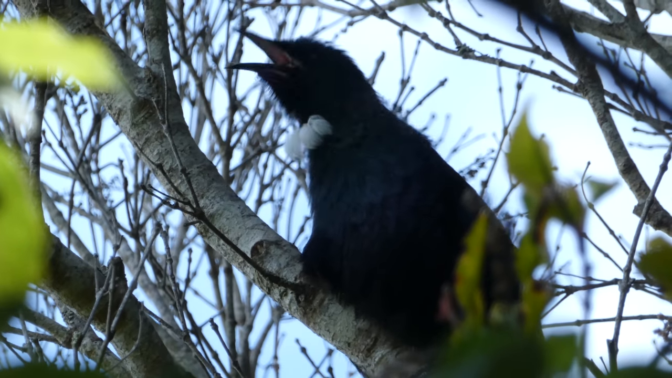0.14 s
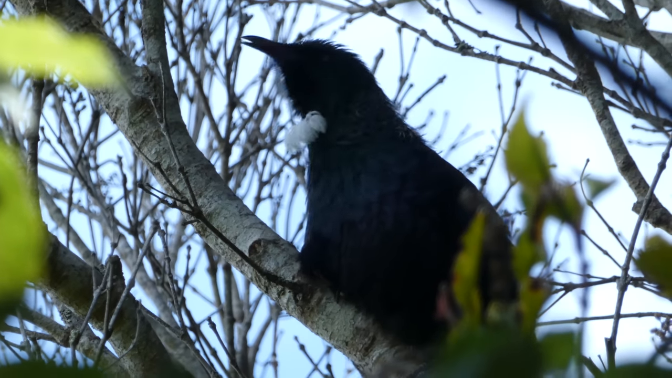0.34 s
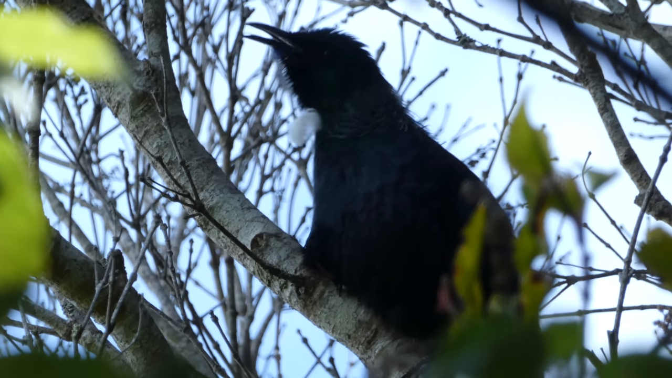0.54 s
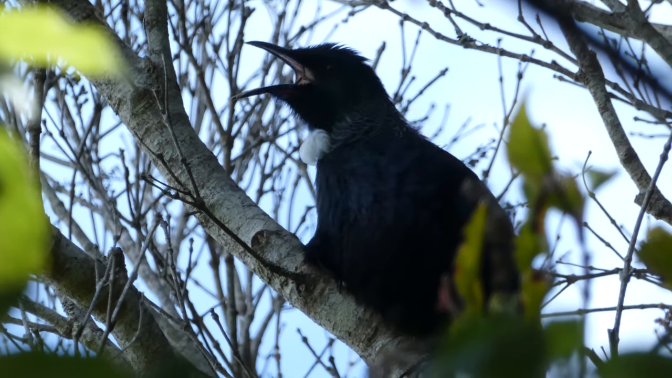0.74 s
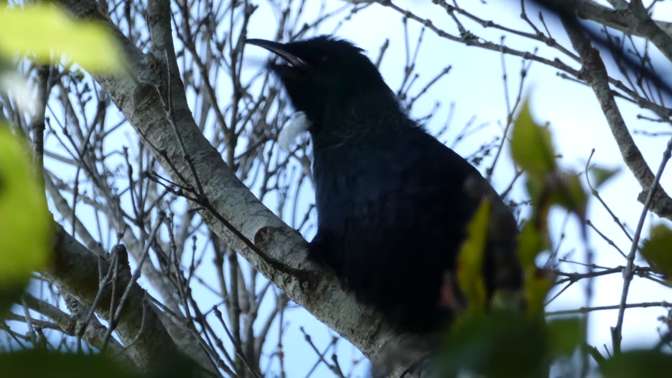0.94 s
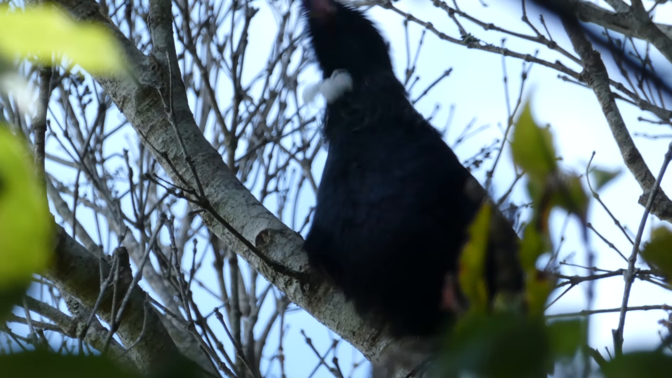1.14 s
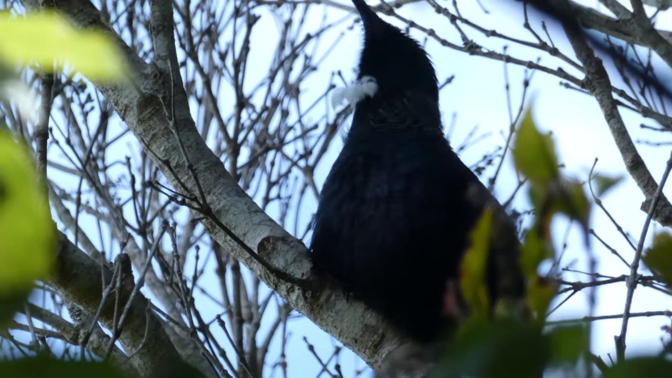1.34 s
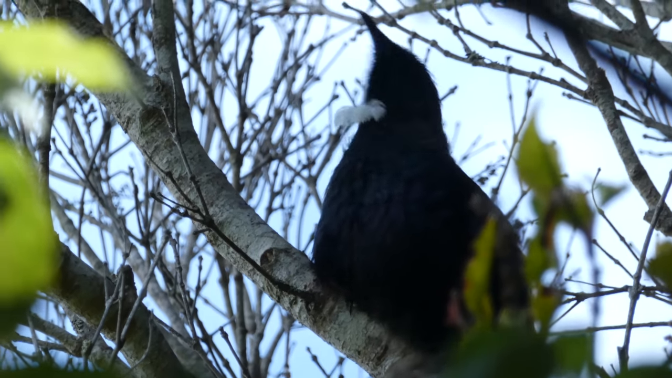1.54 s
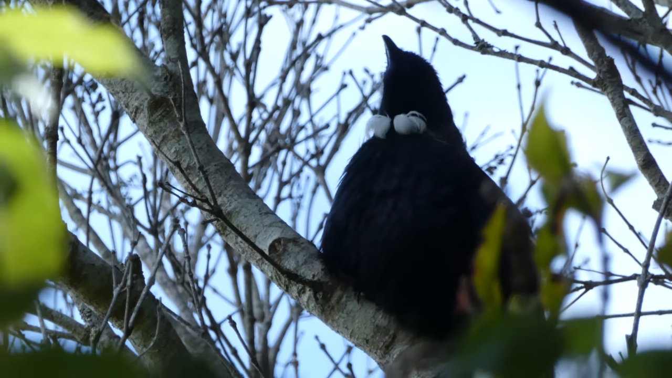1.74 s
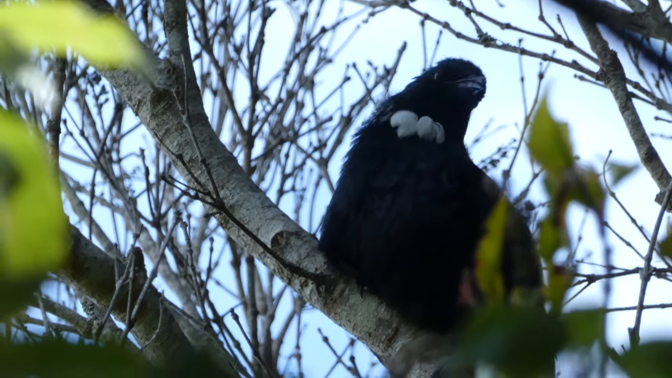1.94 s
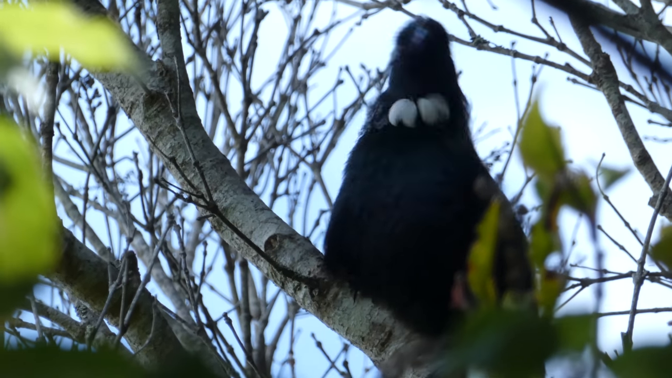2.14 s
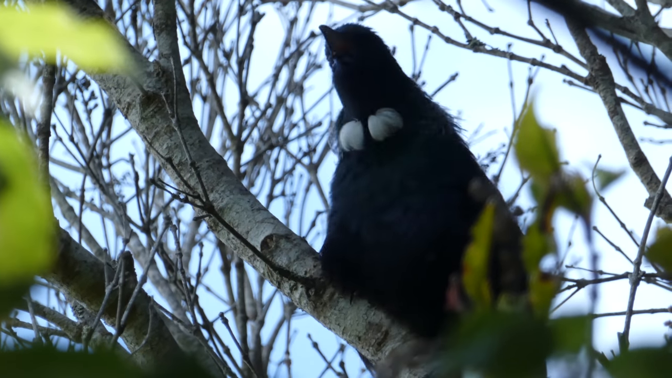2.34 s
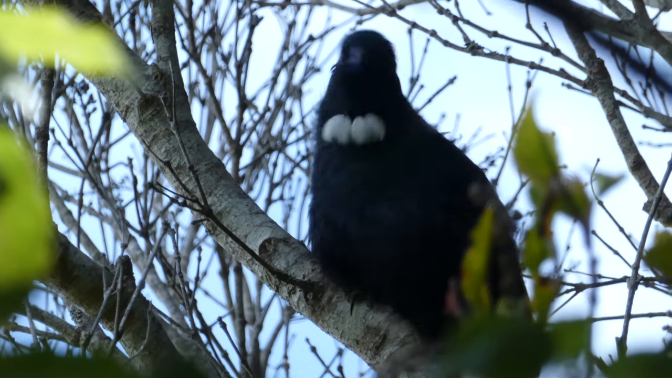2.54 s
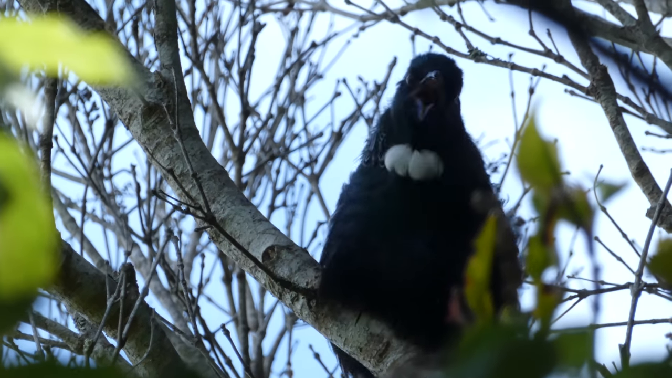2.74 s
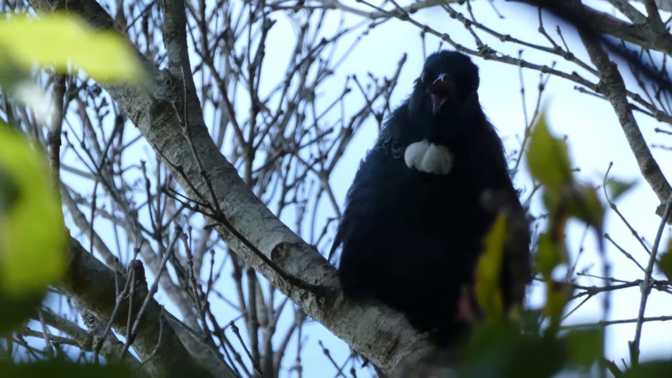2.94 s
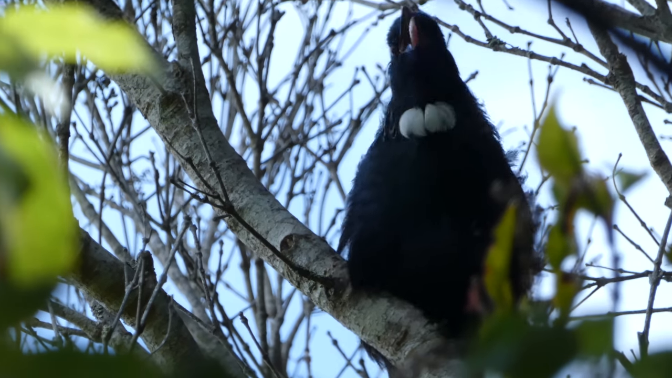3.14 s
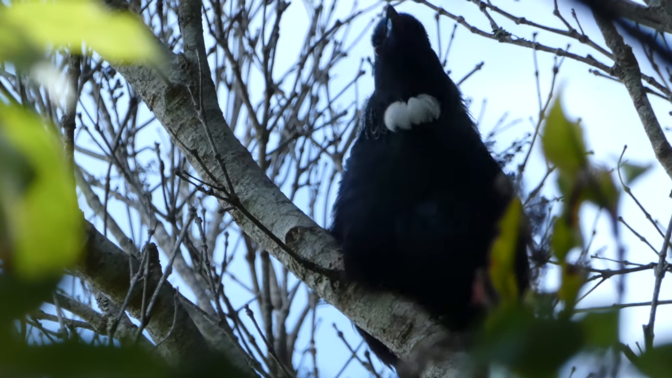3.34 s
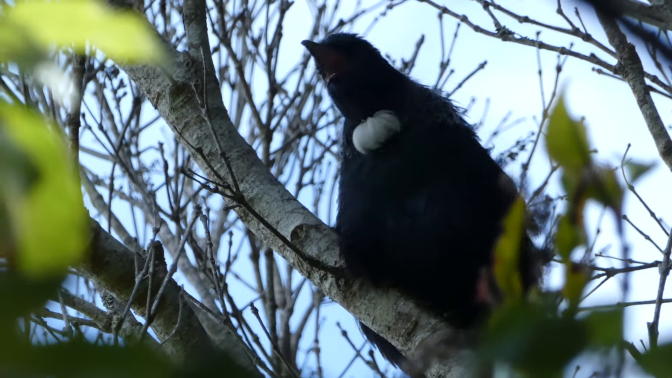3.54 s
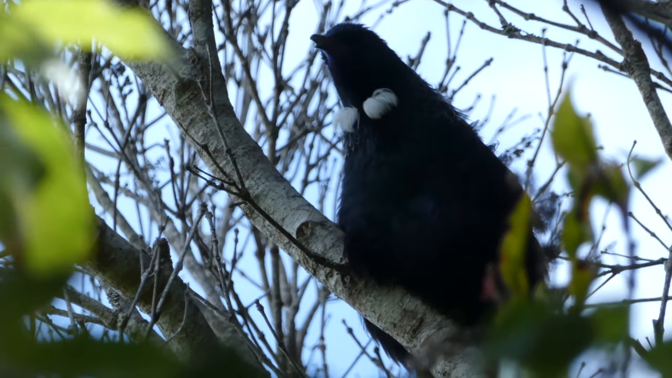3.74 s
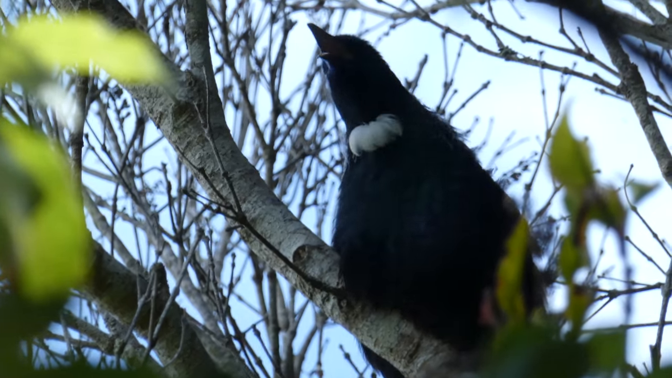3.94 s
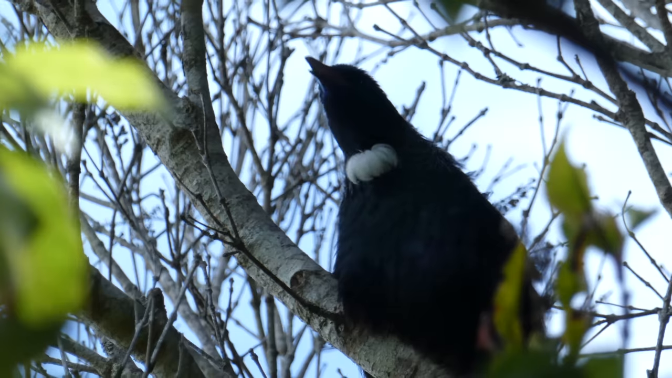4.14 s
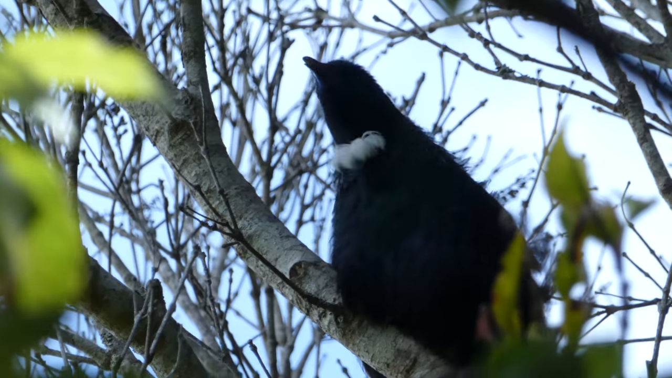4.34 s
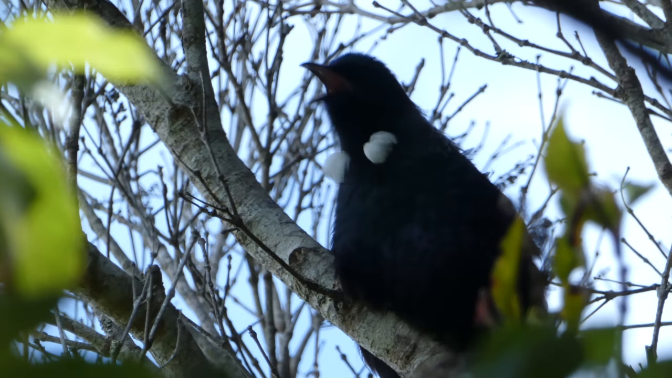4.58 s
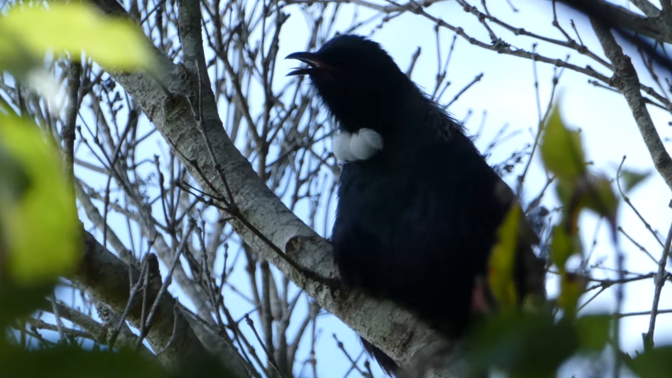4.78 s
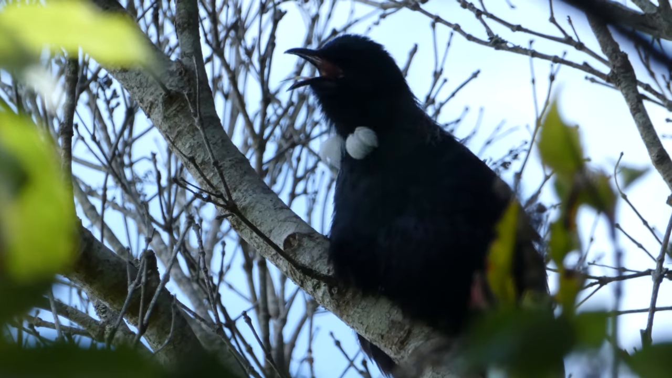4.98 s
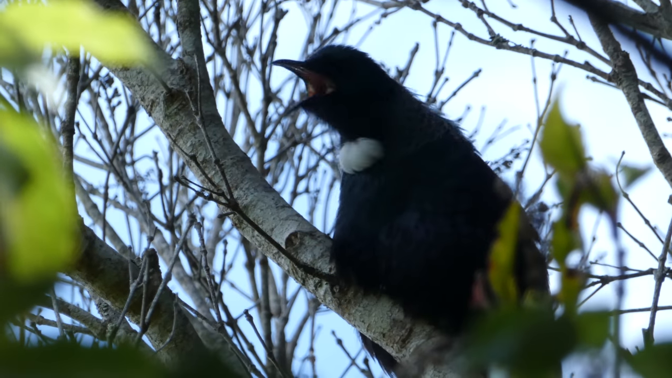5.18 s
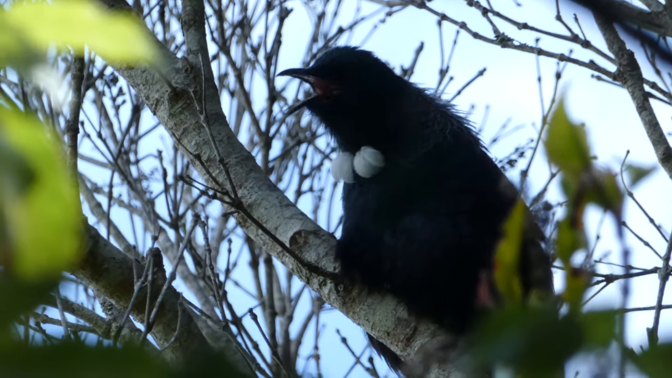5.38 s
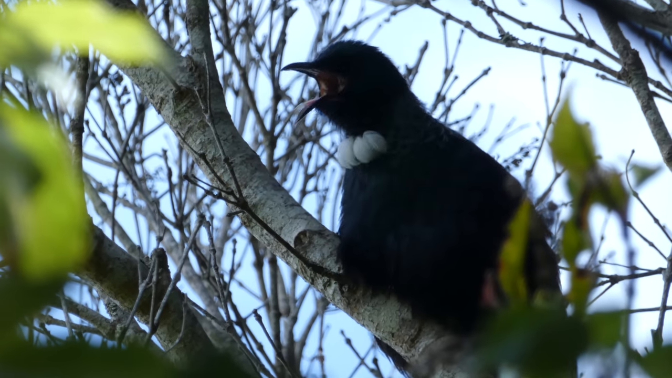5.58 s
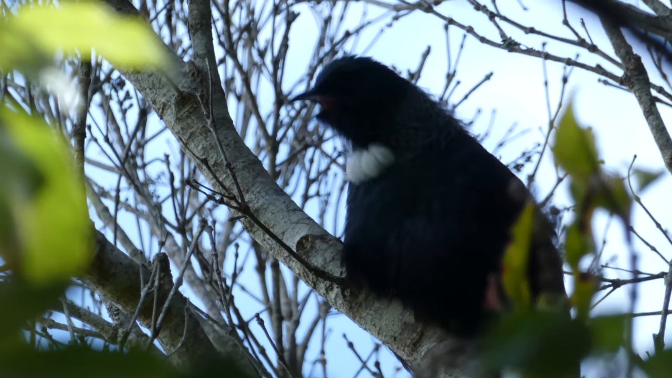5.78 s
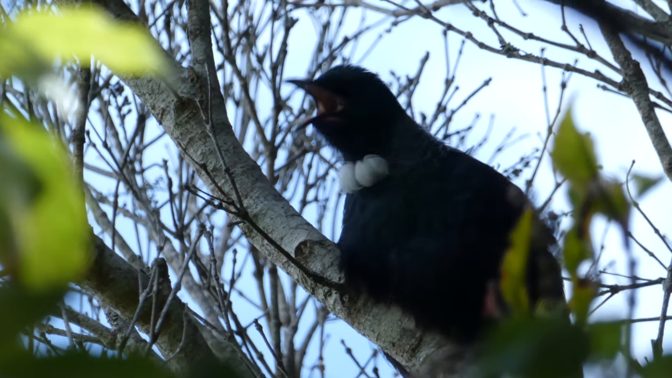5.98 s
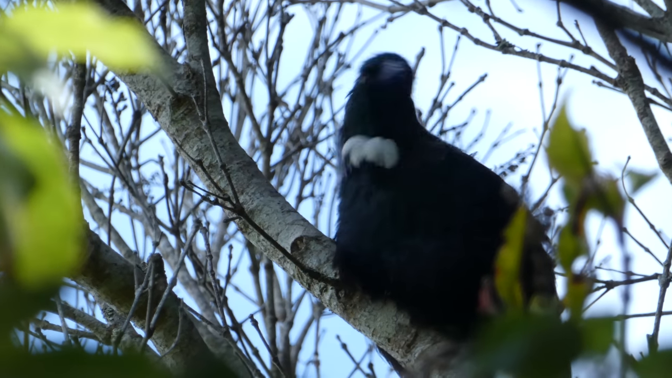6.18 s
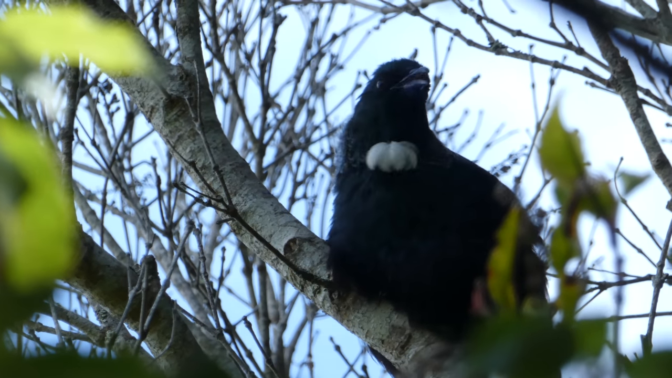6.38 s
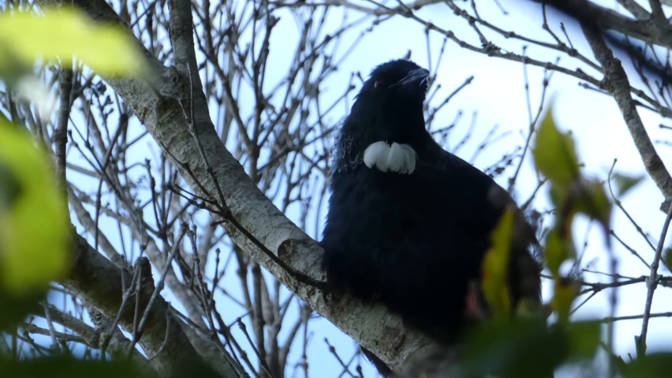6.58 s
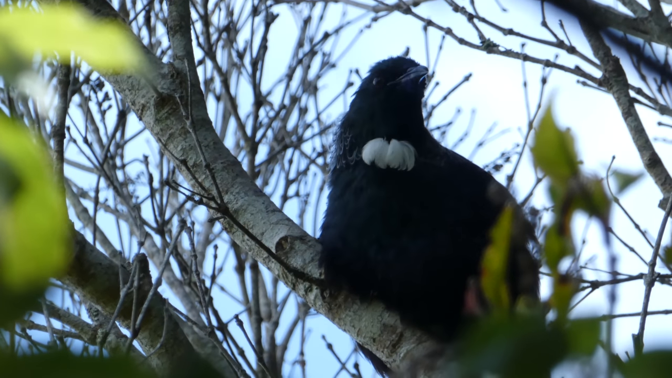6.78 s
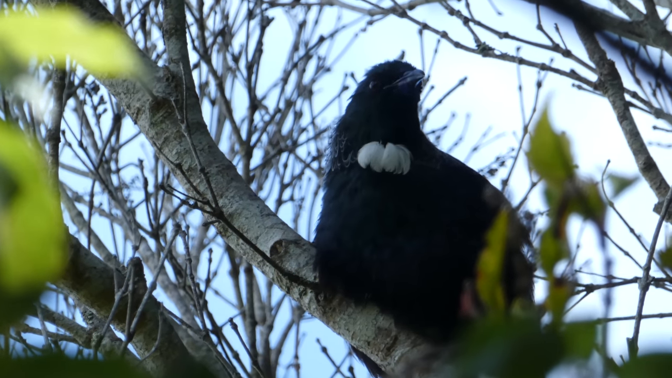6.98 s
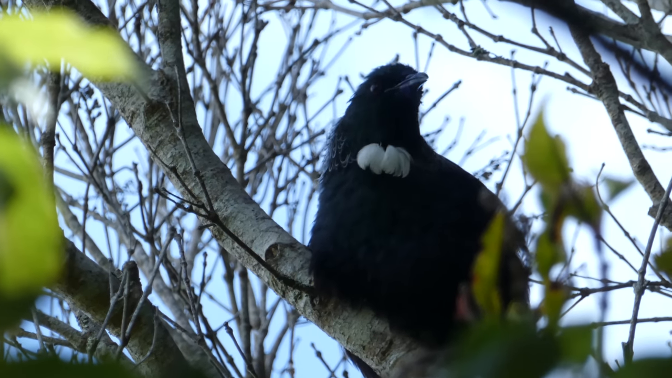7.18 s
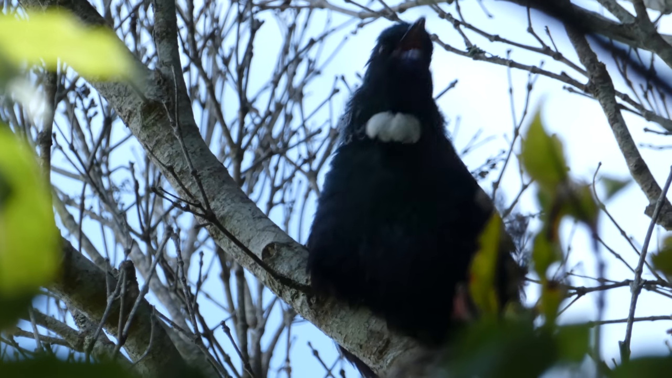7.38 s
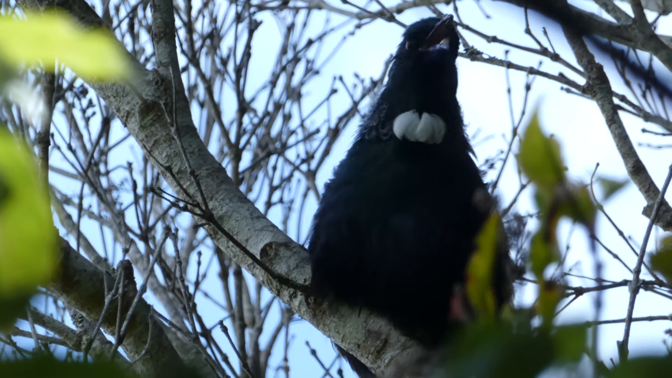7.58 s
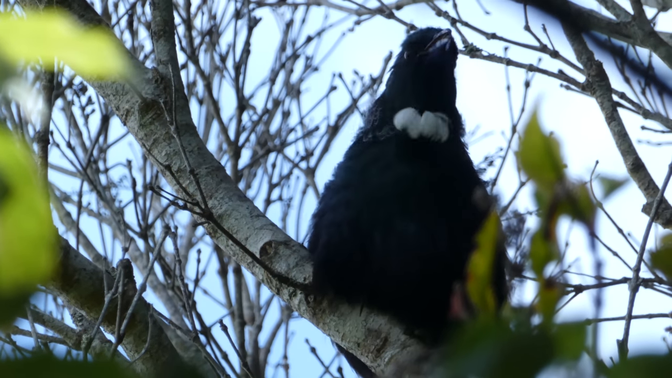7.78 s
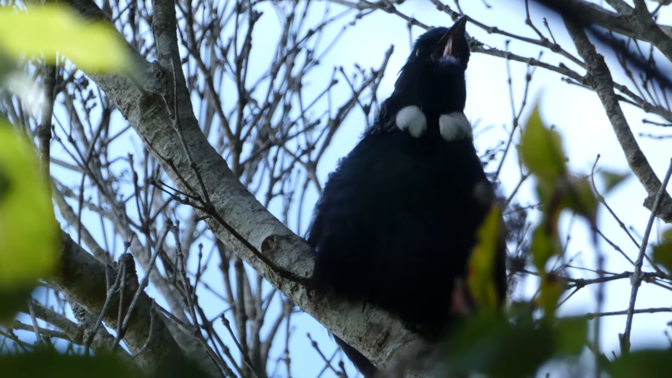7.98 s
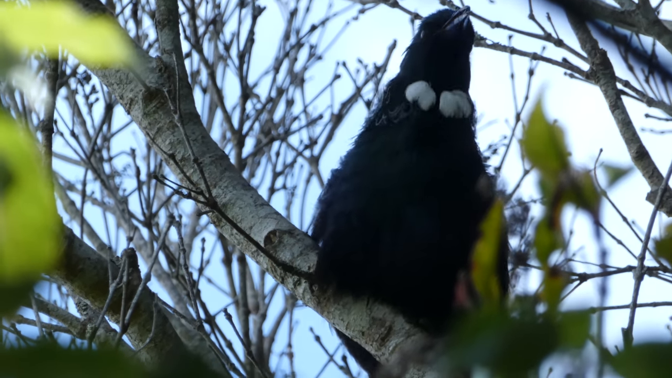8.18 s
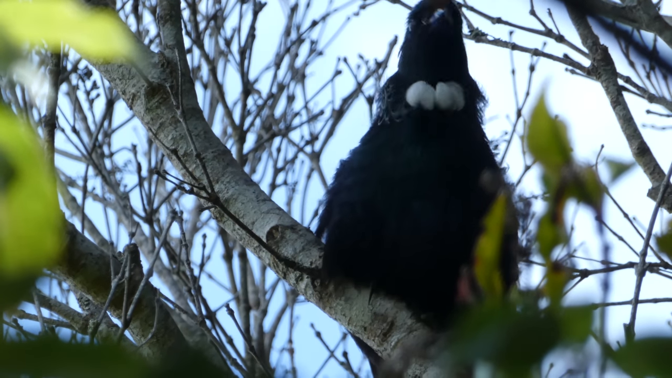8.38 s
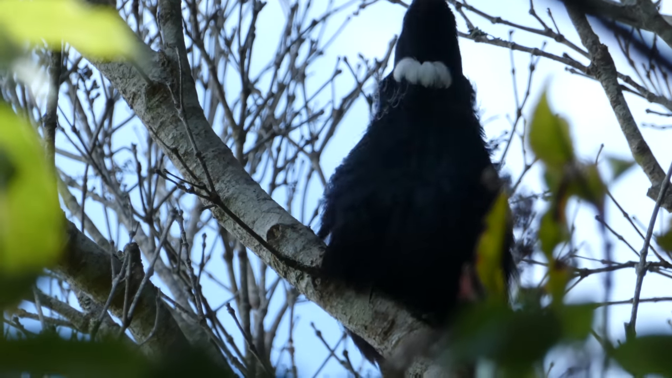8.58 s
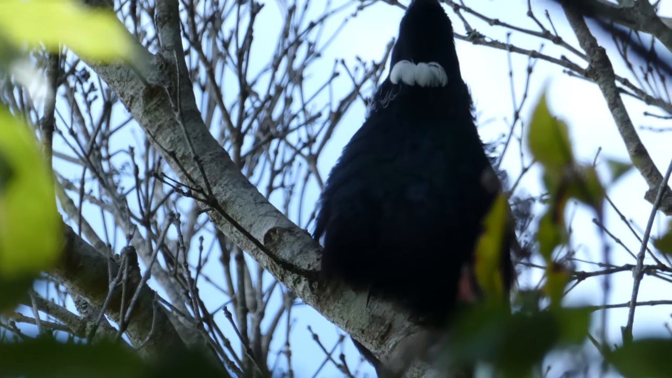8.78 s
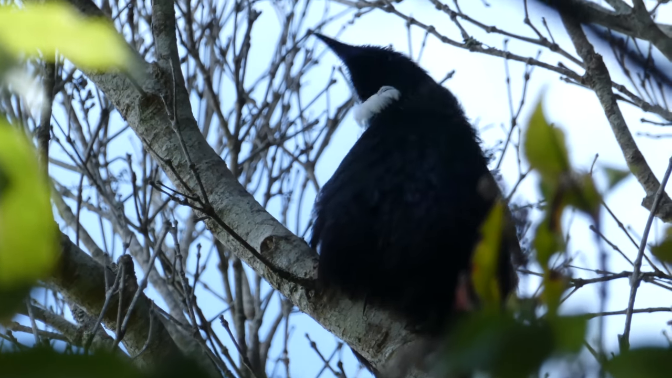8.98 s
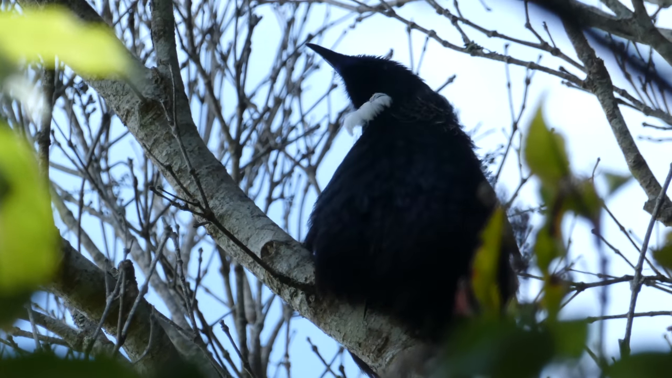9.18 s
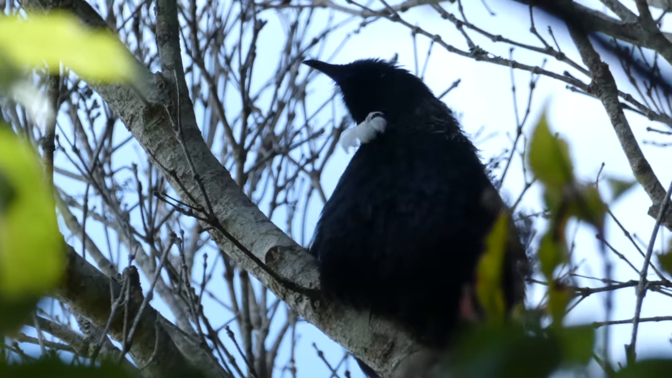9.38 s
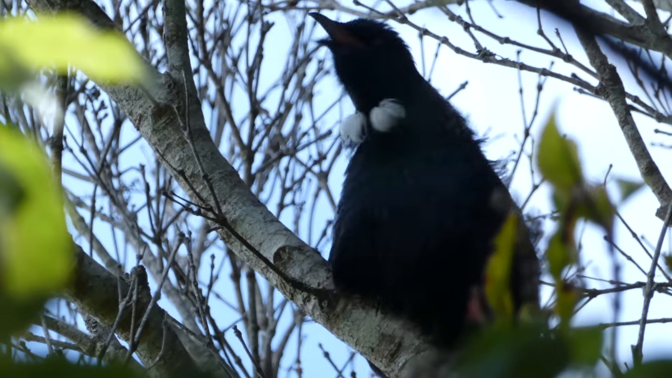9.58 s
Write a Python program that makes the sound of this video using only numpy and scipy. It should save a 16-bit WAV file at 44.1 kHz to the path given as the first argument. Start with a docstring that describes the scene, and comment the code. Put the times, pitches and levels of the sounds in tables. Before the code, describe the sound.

Sparse, intricate birdsong outdoors, centred and close to a stereo pair. Dry clicks and chirped whistles alternate with tiny rising squeaks, rough fluttering trills and a fast wooden rattle. After a pause around the middle, the bird resumes with clicks and pips, peaks on a short chiming note that slides away, and ends with a rasp. Faint far bird calls and quiet hiss lie behind, with brief woodland reflections.

```python
"""Honeyeater in a near tree

A honeyeater sings from a tree close to a stereo microphone pair, in phrases with short rests.
Settling tones make whistles, scoops squeaks, shaped harmonics notes, trills and a bell; tone pairs warble.
Short resonances make dry clicks, uneven pulses harsh rasps, and bands of noise hoarse hisses.
A limb and the twigs around it answer briefly; behind are a soft outdoor hiss and faint far birds."""
import sys
import numpy as np
from scipy import signal
from scipy.fft import rfft, irfft, next_fast_len
from scipy.io import wavfile
from scipy.ndimage import map_coordinates

SR = 44100
rng = np.random.default_rng(int(sys.argv[2]) if len(sys.argv) > 2 else 0)


def file_out(sig):
    """Save sig as 16-bit WAV at sys.argv[1]."""
    # one column per channel
    cols = np.atleast_2d(sig).T
    # limit, then scale
    lim = np.clip(cols, -1, 1)
    pcm = np.round(lim * 32767).astype(np.int16)
    wavfile.write(sys.argv[1], SR, pcm)


N = 424683

# colour of the outdoor hiss: frequency_hz, relative_density_db (per Hz)
AIR_COLOUR = [(12, -25.5), (20, 2), (59, -11), (153, -7.5), (227, -3.5), (292, -0.5), (775, -6.5),
              (1650, -13.5), (1840, -8), (3130, -22.5), (3700, -16), (5780, -23.5), (15800, -30)]
# likeness of the hiss at the two microphones: frequency_hz, left_right_correlation (-1 to 1)
AIR_CORRELATION = [(25, 1), (60, 0.31), (180, -0.46), (700, -0.33), (1500, 0.14), (12000, 0.67)]
AIR_DB = -59  # rms, ahead of the microphone's band limits
# faint far calls: start_s, length_s, start_hz, end_hz, level_db (ahead of flutter and scatter)
FAR_CALLS = [(1.46, .39, 819, 811, -62), (1.532, .33, 641, 641, -62), (6.52, .22, 4410, 3980, -64),
             (6.757, 0.14, 4400, 4100, -64.5), (6.946, .1, 4530, 4300, -63), (6.99, .18, 3810, 3630, -62),
             (7.31, .09, 4530, 4180, -65), (8.2, .18, 4420, 4350, -65), (9.322, .21, 2164, 2290, -61.5)]
# decay of the scatter from twigs and leaves: frequency_hz, t60_s
WOODS_DECAY = [(200, 0.41), (3000, 0.26), (15000, 0.33)]
TOP_HZ = 15800  # upper band limit

# hoarse hisses: start_s, length_s, level_db, centre_hz, width_octaves
HISSES = [(.195, 0.088, -50.5, 4340, .064), (.202, 0.1, -57.5, 6900, .11), (.235, .06, -64, 9600, .1),
          (3.025, .045, -59, 10500, .12), (3.476, .262, -59.8, 5600, .7), (4.608, .09, -62, 5500, .14),
          (4.882, .06, -53, 3900, .28), (7.404, .05, -57, 9160, .17), (7.418, .04, -52.5, 1850, 1),
          (7.416, .05, -57, 5700, 0.15)]

# single dry clicks: start_s, level_db, resonance_hz, upper_db (second resonance and crack, against the first)
SINGLE_CLICKS = [(0.147, -42, 1040, -20), (0.169, -41, 940, -3.5), (.217, -36.5, 4100, -16),
                 (.232, -33, 4210, -16), (0.2574, -30, 4240, -21), (.2703, -34.5, 4420, -11),
                 (.282, -34.5, 4330, -22), (4.571, -35.5, 4150, -24), (4.661, -32, 4650, -19),
                 (4.7238, -30.5, 4660, -26), (4.745, -38, 4600, -22), (7.438, -42, 2300, -3.5),
                 (7.4722, -42, 3550, -2), (7.482, -37.5, 3870, -5)]
CLICK_UPPER_RATIO = 1.62  # a single click's second resonance over its first
# the rattle is a run of clicks that slows a little
RATTLE_AT_S, RATTLE_COUNT, RATTLE_GAP_S, RATTLE_SLOWING_S = 3.465, 9, .0258, .00034
# full level, first click against it, clicks it takes to build up
RATTLE_DB, RATTLE_ONSET_DB, RATTLE_BUILD_CLICKS = -31, -9.5, 2.6
# mean pitch of its two resonances; level of the upper against the lower
RATTLE_LOW_HZ, RATTLE_HIGH_HZ, RATTLE_HIGH_DB = 2530, 5050, 3.5

# harsh rasps: start_s, length_s, break_s (after the start), pitch_hz (at the start),
# level_db, clean_fundamental_db, clean_octave_db
RASPS = [(1.195, 0.074, .05, 1062, -34.5, -52.5, -32.5), (8.455, .15, .076, 1005, -31.5, -49.5, -50)]
# throat colour, one list for each rasp: frequency_hz, relative_gain_db
RASP_COLOURS = [
    [(240, -76), (400, -42), (880, -19), (979, -12.5), (1500, 3.5), (2000, 0.5), (3550, -9.5), (4260, -3),
     (15000, -56)],
    [(240, -67), (400, -21), (804, -17), (949, -11), (1160, -3), (1800, -2.5), (2150, -3.5), (4810, -3.5),
     (15000, -44.5)],
]
RASP_ATTACK_S, RASP_ONSET_DB, RASP_RELEASE_DB_PER_S = 0.019, -22, 618
# pitch sags, then drops by a share, from just before the break
RASP_SAG_HZ_PER_S, RASP_DROP, RASP_DROP_S, RASP_LEAD_S = 1000, .49, .046, .019

# two-voiced warbles: start_s, length_s, low_start_hz, low_end_hz, high_start_hz, high_end_hz,
# level_db (high voice, ahead of the bill)
DUETS = [(3.87, 0.048, 1906, 2030, 3630, 2730, -46.5), (3.972, 0.04, 1910, 1873, 2610, 2520, -46.5),
         (4.089, 0.031, 1939, 1847, 3010, 2550, -54), (4.196, 0.057, 1930, 1750, 2776, 2674, -55),
         (4.471, 0.057, 1537, 1725, 2024, 2574, -58)]
# pure whistles: start_s, length_s, start_hz, end_hz (both sound 1 % lower), peak_place (0-1), level_db
WHISTLES = [(0.129, 0.042, 6150, 5730, 1, -51.5), (.452, 0.025, 5140, 4680, 0.4, -51.5),
            (0.474, 0.042, 1890, 1767, 0.6, -53.5), (0.64, 0.073, 2660, 2590, 0.95, -54),
            (0.991, 0.023, 2080, 1950, .3, -50), (1.035, 0.022, 1900, 2057, 0.83, -33),
            (2.97, 0.01, 6660, 4600, 0.1, -46.5), (3.857, 0.023, 1440, 1810, .6, -52),
            (4.222, 0.032, 4560, 4100, .8, -54), (4.499, .026, 2140, 2515, .6, -50.5),
            (4.582, 0.022, 2280, 1845, 0.46, -43), (4.61, 0.023, 2360, 1715, .54, -38.5),
            (4.666, .03, 2510, 2226, 1, -43.5), (4.68, 0.035, 1900, 1773, .1, -46.5),
            (4.976, 0.048, 2235, 2218, 0.5, -45.5), (5.046, 0.029, 5120, 4540, 0.95, -41.5),
            (5.085, .068, 4330, 2790, 0.74, -50.5), (5.211, .068, 4040, 3795, 0.86, -47),
            (5.339, .19, 11700, 9200, .75, -58.5), (5.379, 0.11, 9100, 8230, .9, -57),
            (5.802, 0.042, 647, 1012, 0.3, -55), (7.765, .017, 2568, 2530, .7, -29)]
# high squeaks that scoop up to their top: start_s, length_s, top_hz, level_db
SQUEAKS = [(2.218, 0.017, 6300, -49), (2.246, 0.0072, 5790, -36), (2.264, .013, 5710, -35),
           (2.351, 0.024, 6200, -36), (2.702, .034, 5960, -42.5), (2.767, 0.036, 6180, -43.5),
           (2.928, 0.049, 7620, -45), (3.002, 0.059, 8010, -44), (4.734, 0.045, 10200, -51.5),
           (5.283, 0.0059, 4650, -34), (5.311, 0.039, 10000, -54), (7.724, 0.022, 7500, -58.5)]
SCOOP_S = 0.1  # every squeak climbs the same parabola, which would take this long from zero pitch
# reedy notes: start_s, length_s, start_hz, end_hz, arch_hz (added in the middle), peak_place (0-1),
# fundamental_db, throat_hz, throat_sharpness, overtones_db (ahead of the throat)
NOTES = [(1.081, 0.056, 1131, 1020, 10, 0.67, -35.5, 4620, 8.3, -51),
         (2.753, 0.023, 946, 1265, 0, .3, -46, 4660, 5.4, -44),
         (4.28, 0.049, 1950, 1850, 130, 0.6, -51, 3880, 5.8, -45),
         (5.59, 0.078, 1286, 1263, 0, 0.97, -54.5, 3340, 5.1, -29.5),
         (5.845, 0.13, 1162, 1205, 48, 0.87, -47, 3520, 0.25, -46.5),
         (6.431, .039, 1059, 923, 0, 0.5, -48.5, 4430, .2, -50),
         (7.625, 0.056, 1226, 1354, 0, .12, -45, 3540, 4.4, -40.5),
         (7.742, .032, 1253, 1265, 0, .91, -38, 2530, 1.4, -44),
         (7.917, 0.011, 3950, 4210, 0, .12, -37, 8300, 3.3, -44),
         (8.388, .07, 1565, 1470, 210, 0.48, -38.5, 3200, 4, -53)]

# throat resonances through an open bill: frequency_hz, gain_db
OPEN_THROAT = [(900, -16), (1300, -12), (1900, -4), (2400, -3), (3100, -1.5), (3750, 1), (4200, -10.5),
               (4900, -21.5), (6300, -33.5), (8000, -41.5), (12000, -37.5)]
# trills: start_s, flick_count, gap_s, top_hz (mean), level_db (ahead of onset, fade and throat)
TRILLS = [(0.7247, 7, 0.025, 1299, -31.5), (3.119, 4, .042, 1057, -29), (6.006, 7, .0255, 1325, -32.5)]
# first flick against the rest, flicks it takes to build up, loss per flick
TRILL_ONSET_DB, TRILL_BUILD_FLICKS, TRILL_FADE_DB = -7.5, 0.64, 0.38

# swell of the long bell note: time_s, level_db (ahead of the bell's gain and throat)
BELL_SWELL = [(7.935, -64), (7.951, -29.5), (7.967, -25), (7.985, -22), (8.007, -36), (8.021, -24),
              (8.033, -27), (8.061, -39.5), (8.133, -43), (8.18, -56.5)]
BELL_HZ, BELL_SHARP_HZ, BELL_SETTLE_S = 1165, 86, 0.0275  # held pitch; it starts sharp and settles
SLIDE_AT_S, SLIDE_S, SLIDE_END_HZ = 8.05, .108, 547  # its closing slide
HOP_AT_S, HOP_S = 8.04, .045  # the throat moves from the octave to the third harmonic


def amp(db):
    """Decibels to gain."""
    return 10 ** (np.asarray(db) / 20)


def unit(x):
    """Scale to rms 1."""
    return x / np.sqrt(np.mean(x ** 2) + 1e-20)


def along(points, hz):
    """(Hz, value) points on a log axis."""
    f, v = np.transpose(points)
    return np.interp(np.log(hz + 1), np.log(f + 1), v)


def curves(rows):
    """One value per sample for each column, from the first row's time to the last."""
    s, *cols = np.transpose(rows)
    return [np.interp(np.arange(s[0], s[-1], 1 / SR), s, c) for c in cols]


def wobble(n, rate):
    """A smooth random curve of n samples, rate knots a second."""
    return map_coordinates(rng.standard_normal(1024), [np.arange(n) * rate / SR], mode="mirror")


def filtered(x, response):
    """x times a response of frequency."""
    n = x.shape[-1]
    m = next_fast_len(n + 8192)
    return irfft(rfft(x, m) * response(np.fft.rfftfreq(m, 1 / SR)), m)[..., :n]


def add(track, s, sound):
    """Mix a sound into a track at time s."""
    part = track[max(round(s * SR), 0):][:len(sound)]
    part += sound[:len(part)]


def swell(length, peak, shape):
    """A rounded rise and fall with its top at the share peak of its length."""
    u = np.linspace(0, 1, int(length * SR))
    return np.abs(np.sin(np.pi * np.interp(u, [0, np.clip(peak, .03, .97), 1], [0, .5, 1]))) ** shape


def phase_of(pitch, jitter, rate):
    """Phase of a membrane whose pitch trembles by the share jitter."""
    return 2 * np.pi * np.cumsum(pitch * (1 + jitter * wobble(len(pitch), rate))) / SR


def band_noise(n, hz, octaves):
    """Noise of rms 1 in a bell-shaped band."""
    return unit(filtered(rng.standard_normal(SR), lambda f: np.exp(-.5 * (np.log2((f + 1) / hz) / octaves) ** 2)))[:n]


def sing(env, pitch, partials, jitter, flutter_db=1.86):
    """One note of (multiple of the pitch, gain) partials; it flutters a little in strength."""
    phase = phase_of(pitch, jitter, rate=480)
    tone = sum(gain * np.sin(k * phase) for k, gain in partials if k * pitch.mean() < TOP_HZ)
    return env * amp(flutter_db * wobble(len(env), 403.5)) * tone


def air():
    """Steady outdoor hiss, partly shared by the two microphones."""
    def mid_side_gains(hz):
        # the angle whose mid and side shares give the wanted correlation
        angle = np.arccos(np.clip(along(AIR_CORRELATION, hz), -1, 1)) / 2
        return amp(along(AIR_COLOUR, hz)) * [np.cos(angle), np.sin(angle)]

    mid, side = filtered(rng.standard_normal((2, N)), mid_side_gains)
    return amp(AIR_DB) * unit(np.array([mid + side, mid - side]))


def far_calls():
    """Distance makes these gliding tones waver in pitch and flutter in level."""
    out = np.zeros(N)
    for start_s, length, start_hz, end_hz, db in FAR_CALLS:
        env = swell(length, peak=0.61, shape=0.32)
        phase = phase_of(np.linspace(start_hz, end_hz, len(env)), jitter=0.0248, rate=550)
        flutter_db = 3 * wobble(len(env), 70)
        add(out, start_s, amp(db + flutter_db) * env * np.sin(phase))
    return out


def woods(x, side_db=-9.5, delay_s=.004):
    """Decaying scatter from twigs and leaves; it changes each half second as the bird turns its head."""
    hop = SR // 2
    out = np.zeros((2, N + hop))
    padded = np.pad(x, (hop, SR))
    for start in range(0, N + hop, hop):
        hz, t, noise = signal.stft(rng.standard_normal((2, hop)), SR, nperseg=256)
        decay = amp(-60 * t / along(WOODS_DECAY, hz)[:, None])
        mid, side = signal.istft(noise * decay, SR, nperseg=256)[1]
        side = amp(side_db) * side
        piece = padded[start:start + SR] * np.hanning(SR)  # overlapping pieces crossfade
        for channel, tail in zip(out, (mid + side, mid - side)):
            scatter = signal.fftconvolve(piece, tail / np.linalg.norm(tail))
            add(channel, start / SR + delay_s, scatter)
    return out[:, hop:]


def limb_echo(bird):
    """One echo off a near limb, later and weaker than the direct song."""
    out = np.zeros(N)
    add(out, .009, amp(-8.0) * bird)
    return out


def ease(t, start, length):
    """A smooth step from 0 to 1."""
    return np.sin(np.pi / 2 * np.clip((t - start) / length, 0, 1)) ** 2


def settle(start, end, n, power=1.8):
    """A pitch that moves quickly at first and comes to rest."""
    return end + (start - end) * np.linspace(1, 0, n) ** power


def resonance(hz, throat, sharpness):
    """Gain of one throat resonance, with a steep fall above it."""
    return 1 / np.hypot(1, sharpness * (hz / throat - throat / hz)) / np.hypot(1, (hz / (0.99 * throat)) ** 3.37)


def hisses():
    """Toneless, crackly bands of noise from the open bill."""
    out = np.zeros(N)
    for start_s, length, db, hz, octaves in HISSES:
        env = swell(length, peak=0.99, shape=0.5)
        crackle_db = 1.4 * wobble(len(env), 400)
        add(out, start_s, env * amp(db + crackle_db) * band_noise(len(env), hz, octaves))
    return out


def rattle_clicks(scatter=.055):
    """Start s, dB, lower Hz, upper Hz and upper dB of each click in a rattle that builds up and slows."""
    run = []
    for k, (low, high) in enumerate(1 + scatter * rng.standard_normal((RATTLE_COUNT, 2))):
        start_s = RATTLE_AT_S + RATTLE_GAP_S * k + RATTLE_SLOWING_S * k * k
        db = RATTLE_DB + RATTLE_ONSET_DB * np.exp(-k / RATTLE_BUILD_CLICKS)
        run.append((start_s, db, RATTLE_LOW_HZ * low, RATTLE_HIGH_HZ * high, RATTLE_HIGH_DB))
    return run


def click_tone(n, hz):
    """A slightly unsteady tone of n samples for a click's resonance."""
    return np.sin(phase_of(np.full(n, hz), jitter=0.044, rate=1800))


def clicks(t60_s=0.012, attack_s=0.0015, crack_db=-7, gulp_db=-18):
    """Each click rings two short resonances; in the rattle a low falling gulp follows, scaled with its click."""
    out = np.zeros(N)
    t = np.arange(SR // 40) / SR
    attack = np.sin(np.pi / 2 * np.minimum(t / attack_s, 1)) ** 2
    env = attack * amp(-60 * np.maximum(t - attack_s, 0) / t60_s)
    run = rattle_clicks()
    singles = [(s, db, hz, CLICK_UPPER_RATIO * hz, upper_db) for s, db, hz, upper_db in SINGLE_CLICKS]
    for start_s, db, low_hz, high_hz, upper_db in run + singles:
        crack = amp(crack_db) * band_noise(len(t), high_hz, octaves=0.5)
        upper = amp(upper_db) * (click_tone(len(t), high_hz) + crack)
        add(out, start_s, amp(db) * env * (click_tone(len(t), low_hz) + upper))
    for start_s, db, *_ in run:
        gulp = swell(0.015, peak=0.34, shape=0.23)
        phase = 2 * np.pi * np.cumsum(np.linspace(760, 560, len(gulp))) / SR
        add(out, start_s + 0.00287, amp(db + gulp_db) * gulp * np.sin(phase))
    return out


def rasps(beat_hz=212, depth=0.35, noise_db=-15, smear_s=0.000874):
    """One side of the voice box fires uneven pulses; the other chops them into slower beats."""
    out = np.zeros(N)
    for row, colour in zip(RASPS, RASP_COLOURS):
        start_s, length, break_s, hz, top_db, fundamental_db, octave_db = row
        n = int(length * SR)
        t = np.arange(n) / SR
        sagging = hz - RASP_SAG_HZ_PER_S * np.minimum(t, break_s)
        pitch = sagging * (1 - RASP_DROP * ease(t, break_s - RASP_LEAD_S, RASP_DROP_S))
        onset_db = RASP_ONSET_DB * np.maximum(1 - t / RASP_ATTACK_S, 0)
        release_db = RASP_RELEASE_DB_PER_S * np.maximum(t - break_s, 0)
        # one pulse each time the phase completes a cycle
        cycles = np.floor(phase_of(pitch, jitter=0.056, rate=900) / (2 * np.pi))
        pulses = unit(np.diff(cycles, prepend=0) * amp(3 * wobble(n, 900)))
        beat = 1 + depth * np.sin(phase_of(np.full(n, beat_hz), jitter=0.044, rate=138))
        source = beat * (pulses + amp(noise_db) * rng.standard_normal(n))

        def throat(hz):
            # low frequencies are held longer than high ones, which spreads each pulse
            smear = np.exp(2j * np.pi * smear_s * 3000 * np.exp(-hz / 3000))
            return amp(along(colour, hz)) * smear

        add(out, start_s, amp(top_db + onset_db - release_db) * unit(filtered(source, throat)))
        # a clean tone on the same pitch runs through the rasp, strongest at the break
        env = swell(length, break_s / length, shape=1.0)
        partials = [(1, amp(fundamental_db)), (2, amp(octave_db))]
        add(out, start_s, sing(env, pitch, partials, jitter=0.018))
    return out


def duets(low_db=-6, low_octave_db=-5, sum_db=-5, high_octave_db=-14):
    """Both sides of the voice box sound at once; their coupling adds octaves and a sum tone."""
    out = np.zeros(N)
    for start_s, length, low_start, low_end, high_start, high_end, db in DUETS:
        env = swell(length, peak=0.49, shape=0.68)
        low = phase_of(settle(low_start, low_end, len(env), power=1.95), jitter=0.013, rate=520)
        high = phase_of(settle(high_start, high_end, len(env), power=1.9), jitter=0.011, rate=550)
        voices = np.sin(high) + amp(low_db) * np.sin(low)
        octaves = amp(low_octave_db) * np.sin(2 * low) + amp(high_octave_db) * np.sin(2 * high)
        sum_tone = amp(sum_db) * np.sin(low + high)
        add(out, start_s, amp(db) * env * (voices + octaves + sum_tone))
    # a nearly shut bill mutes their top
    return filtered(out, lambda hz: 1 / np.hypot(1, (hz / 4700) ** 10))


def whistles():
    """Pure notes, each a rounded swell on a settling pitch."""
    out = np.zeros(N)
    for start_s, length, start_hz, end_hz, peak, db in WHISTLES:
        env = swell(length, peak, shape=0.38)
        pitch = settle(start_hz, end_hz, len(env), power=1.8)
        add(out, start_s, sing(env, pitch, [(0.99, amp(db))], jitter=0.012))
    return out


def squeaks(under_db=-9, split_s=0.062, between_db=-28, octave_db=-30):
    """Upward scoops; alternate cycles differ, adding tones at half and one and a half times the pitch."""
    out = np.zeros(N)
    for start_s, length, top_hz, db in SQUEAKS:
        # the half-pitch tone grows steeply with length and reaches under_db at split_s
        under = amp(under_db) * (length / split_s) ** 4
        partials = [(1, 1), (1 / 2, under), (1 + 1 / 2, amp(between_db)), (2, amp(octave_db))]
        env = swell(length, peak=0.7, shape=0.65)
        pitch = top_hz * (1 - (np.linspace(length, 0, len(env)) / SCOOP_S) ** 2)
        add(out, start_s, amp(db) * sing(env, pitch, partials, jitter=.008))
    return out


def notes():
    """Reedy notes: a fundamental with overtones shaped by one throat resonance."""
    out = np.zeros(N)
    for row in NOTES:
        start_s, length, start_hz, end_hz, arch_hz, peak, db, throat_hz, sharpness, overtones_db = row
        env = swell(length, peak, shape=0.93)
        arch = arch_hz * np.sin(np.linspace(0, np.pi, len(env)))
        pitch = settle(start_hz, end_hz, len(env), power=1.5) + arch
        partials = [(1, amp(db))]
        for k in range(2, 8):
            partials.append((k, amp(overtones_db) * resonance(k * pitch, throat_hz, sharpness)))
        add(out, start_s, sing(env, pitch, partials, jitter=0.012))
    return out


def trill_flicks(scatter=0.014):
    """Start s, top Hz and dB of each flick: evenly spaced, building up quickly and fading slowly."""
    flicks = []
    for start_s, count, gap_s, hz, db in TRILLS:
        for k in range(round(count)):
            top_hz = hz * (1 + scatter * rng.standard_normal())
            build_db = TRILL_ONSET_DB * np.exp(-k / TRILL_BUILD_FLICKS)
            flicks.append((start_s + k * gap_s, top_hz, db + build_db - TRILL_FADE_DB * k))
    return flicks


def trills(sweep=0.2205, jitter=0.031):
    """Quick, slightly rough upward flicks whose harmonics pass through the throat's resonances."""
    out = np.zeros(N)
    for start_s, top_hz, db in trill_flicks():
        env = swell(25 / top_hz, peak=0.55, shape=0.51)  # each flick lasts about the same number of cycles
        tension = (top_hz / 1300) ** 3.7  # high flicks sweep further and are rougher than low ones
        pitch = top_hz * (1 - sweep * tension * np.linspace(1, 0, len(env)) ** 2.05)
        phase = phase_of(pitch, jitter * tension, rate=1335)
        tone = sum(amp(along(OPEN_THROAT, k * pitch)) * np.sin(k * phase) for k in range(1, 10))
        flutter_db = 1.2 * wobble(len(env), 517)
        add(out, start_s, amp(db + flutter_db) * env * tone)
    return out


def bell(sharpness=7, leak_db=-44, gain_db=4.0):
    """A narrow throat resonance picks out the octave, then the third harmonic as the pitch slides down."""
    out = np.zeros(N)
    start_s = BELL_SWELL[0][0]
    (db,) = curves(BELL_SWELL)
    t = start_s + np.arange(len(db)) / SR
    sharp = BELL_SHARP_HZ * np.exp(-((t - start_s) / BELL_SETTLE_S) ** 2)
    slide = (SLIDE_END_HZ - BELL_HZ) * ease(t, SLIDE_AT_S, SLIDE_S)
    pitch = BELL_HZ + sharp + slide
    throat_hz = pitch * (1.94 + 1.19 * ease(t, HOP_AT_S, HOP_S))
    phase = phase_of(pitch, jitter=0.005, rate=340)
    tone = sum(resonance(k * pitch, throat_hz, sharpness) * np.sin(k * phase) for k in range(2, 7))
    add(out, start_s, amp(db + gain_db) * tone)
    # the fundamental leaks past the resonance, weaker as it falls
    leak = signal.windows.tukey(len(phase), .15) * (pitch / pitch.max()) ** 1.4 * np.sin(phase)
    add(out, start_s, amp(leak_db) * leak)
    return out


def scene():
    """The bird in the middle, one echo off a near limb, the woods and the air."""
    bird = hisses() + clicks() + rasps() + duets() + whistles() + squeaks() + notes() + trills() + bell()
    # far birds arrive only as scatter
    scatter = woods(amp(-3) * bird + far_calls())
    return air() + scatter + limb_echo(bird) + bird


def record(dry):
    """The microphone rolls off the bass below 45 Hz, and nothing is kept above the band limit."""
    return filtered(dry, lambda hz: (hz < TOP_HZ) * hz / np.hypot(hz, 45))


dry = scene()
out = record(dry)
file_out(out)
```